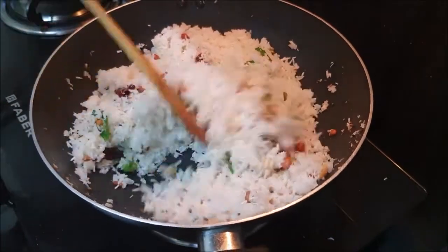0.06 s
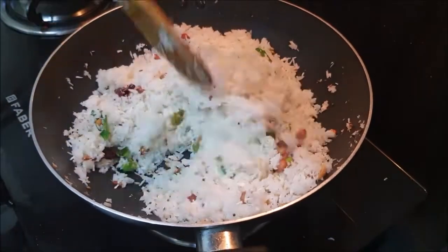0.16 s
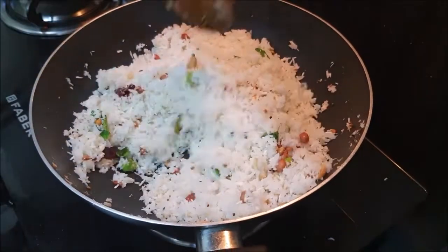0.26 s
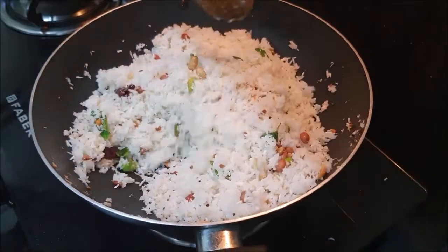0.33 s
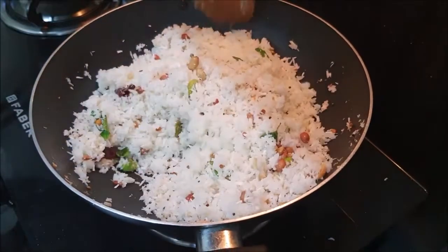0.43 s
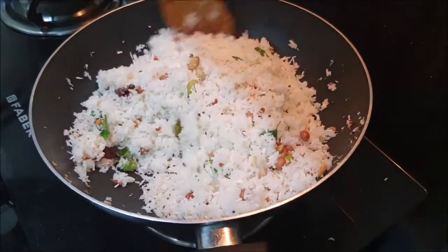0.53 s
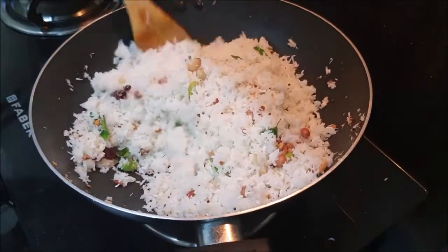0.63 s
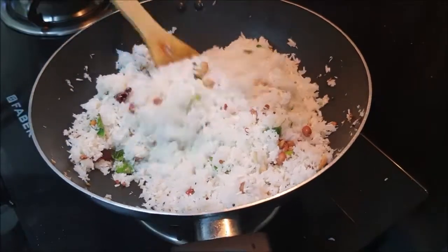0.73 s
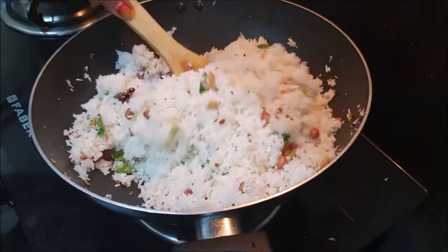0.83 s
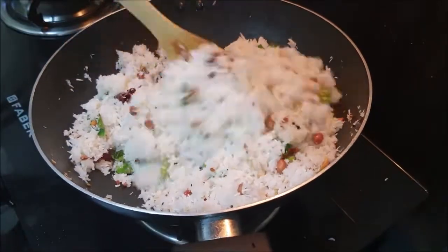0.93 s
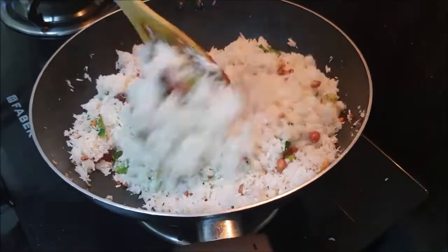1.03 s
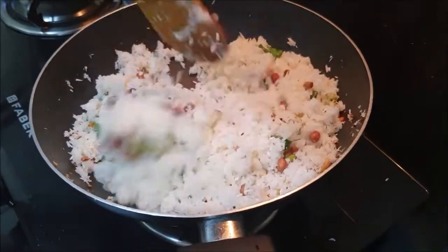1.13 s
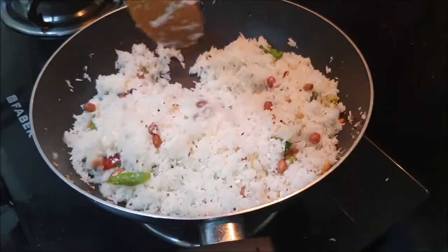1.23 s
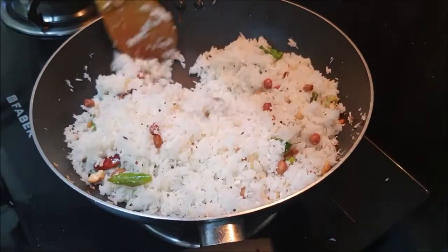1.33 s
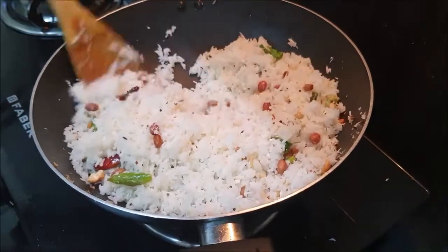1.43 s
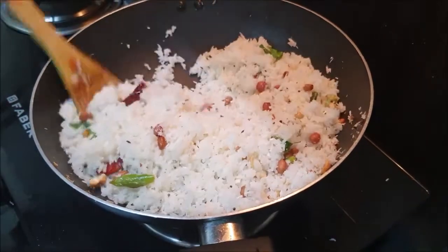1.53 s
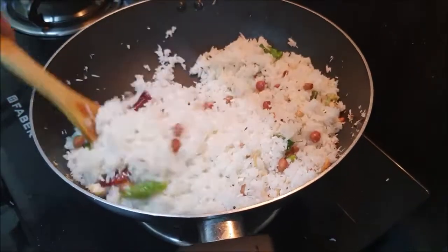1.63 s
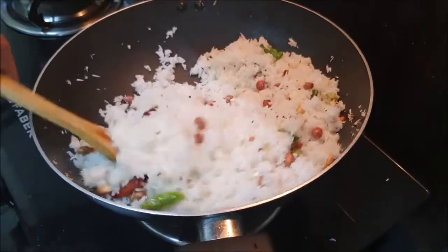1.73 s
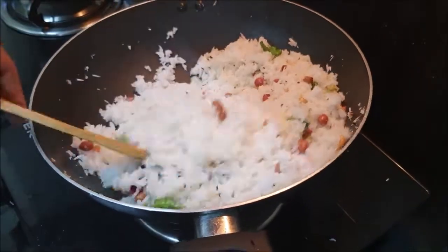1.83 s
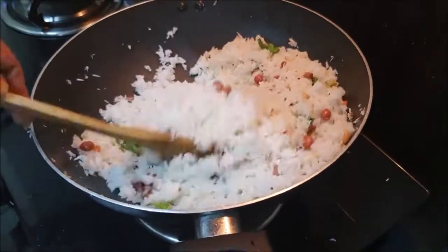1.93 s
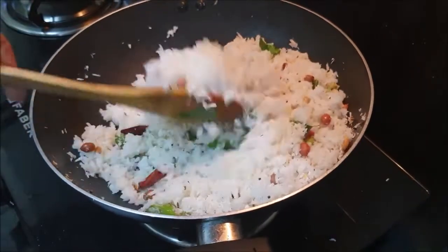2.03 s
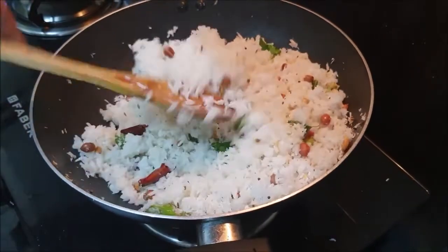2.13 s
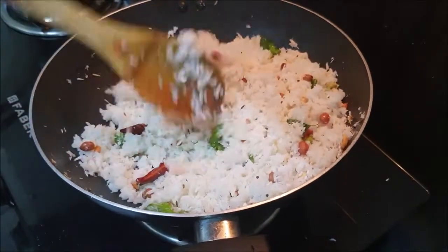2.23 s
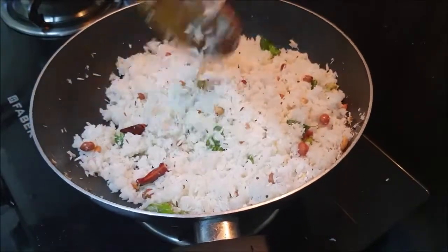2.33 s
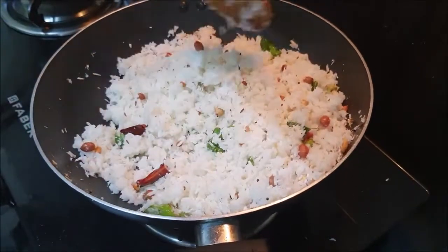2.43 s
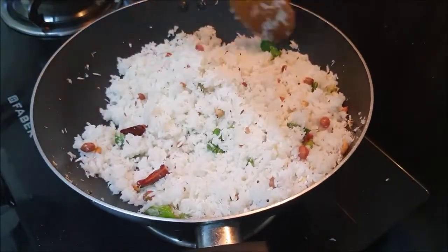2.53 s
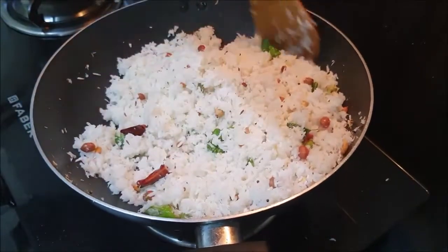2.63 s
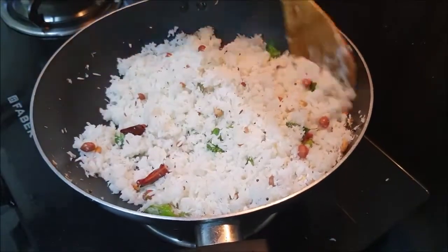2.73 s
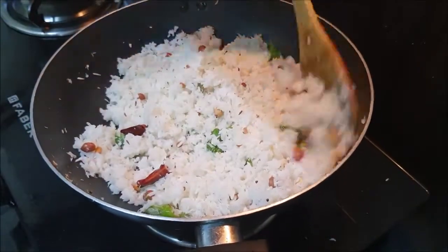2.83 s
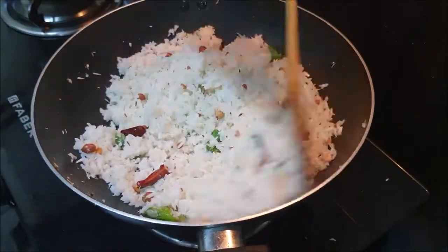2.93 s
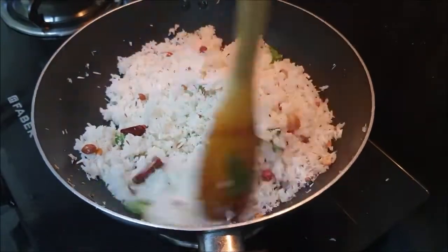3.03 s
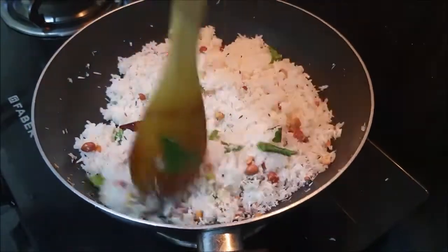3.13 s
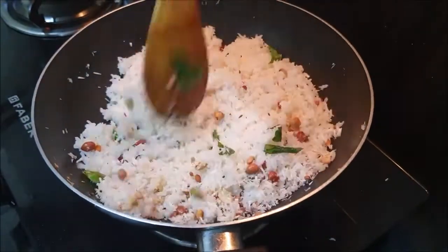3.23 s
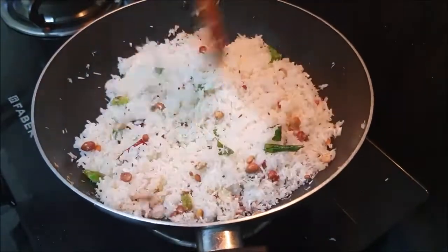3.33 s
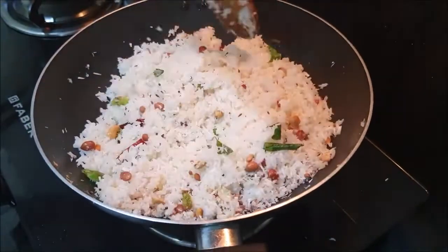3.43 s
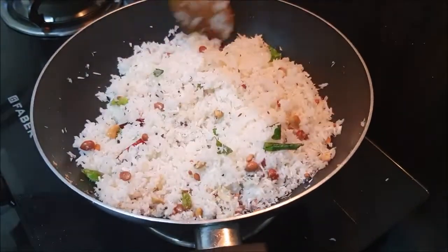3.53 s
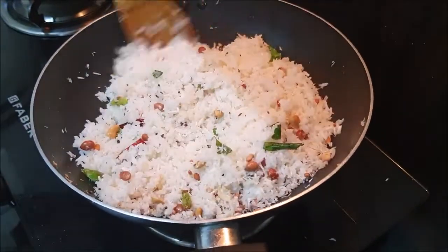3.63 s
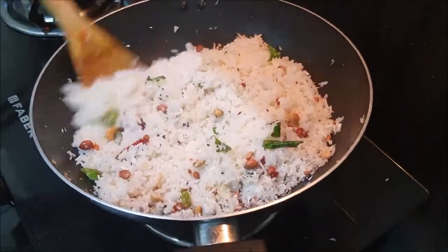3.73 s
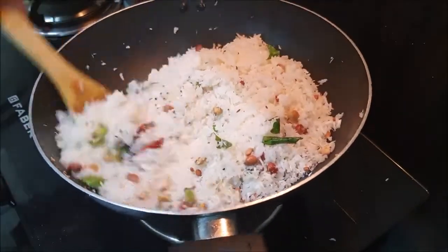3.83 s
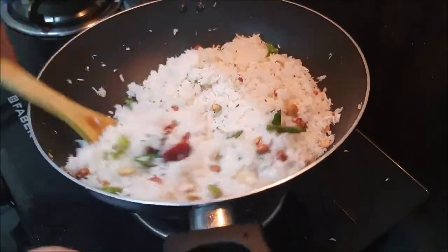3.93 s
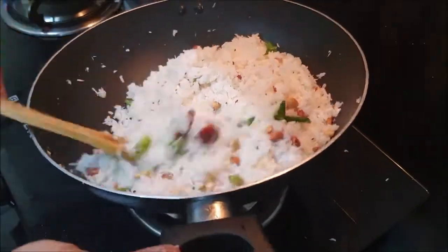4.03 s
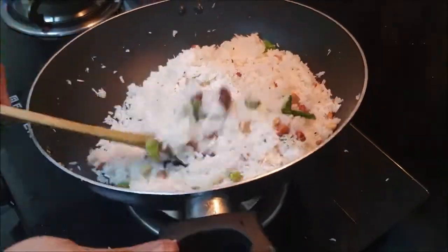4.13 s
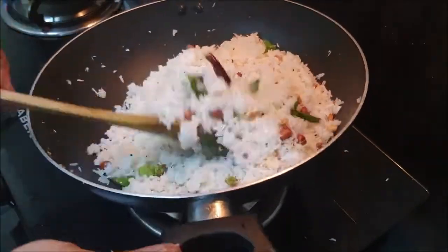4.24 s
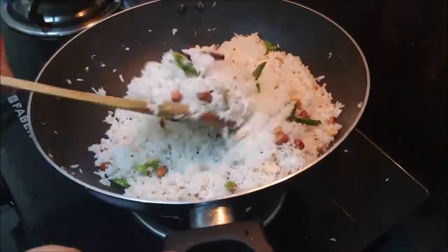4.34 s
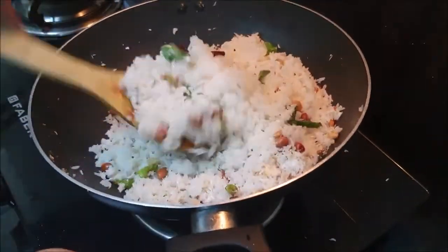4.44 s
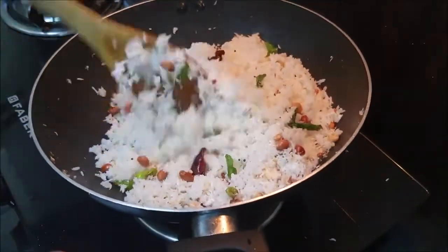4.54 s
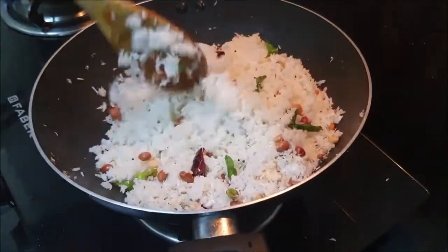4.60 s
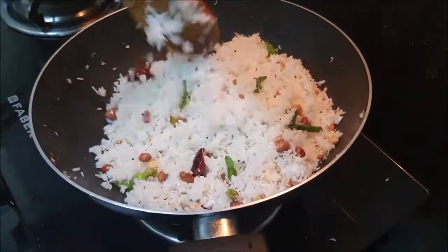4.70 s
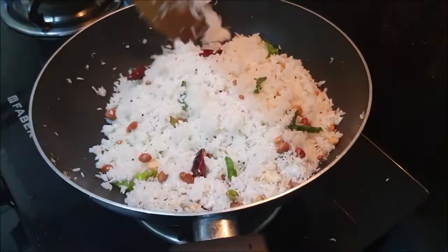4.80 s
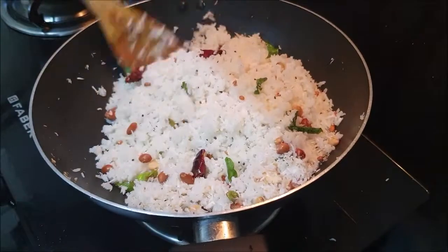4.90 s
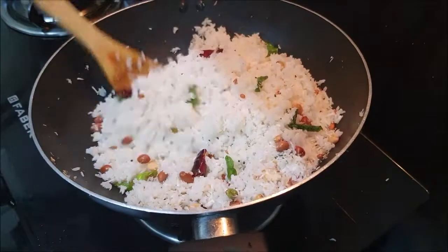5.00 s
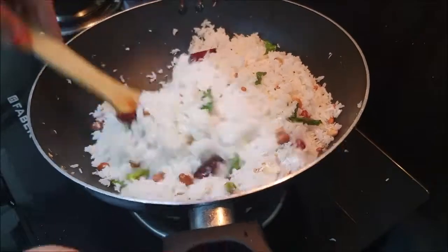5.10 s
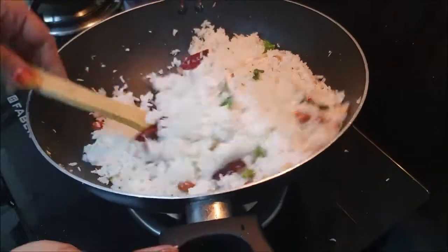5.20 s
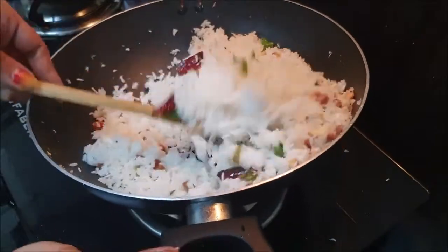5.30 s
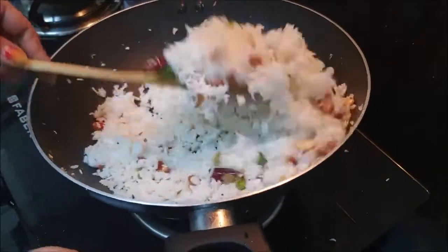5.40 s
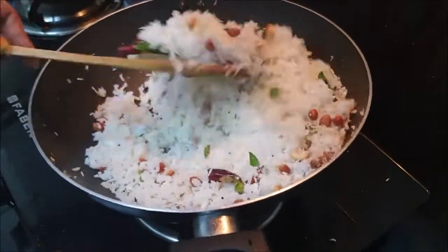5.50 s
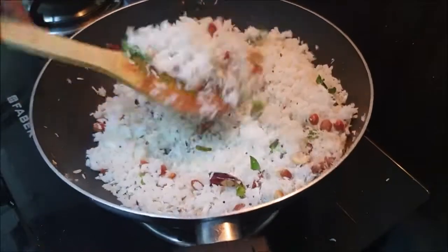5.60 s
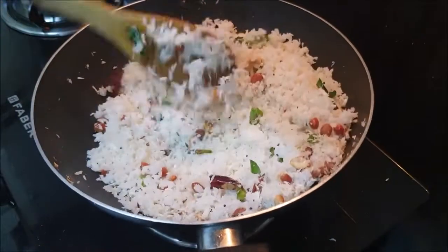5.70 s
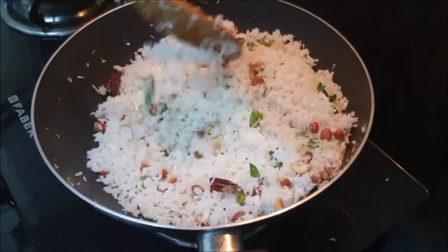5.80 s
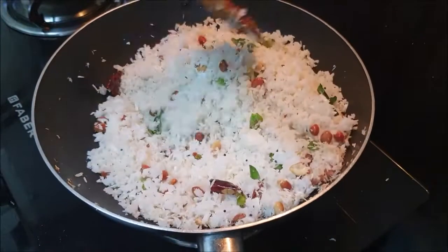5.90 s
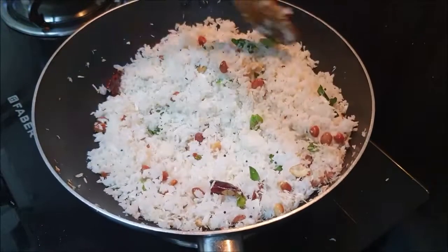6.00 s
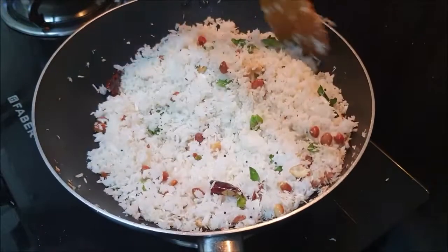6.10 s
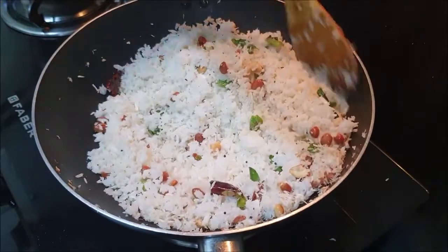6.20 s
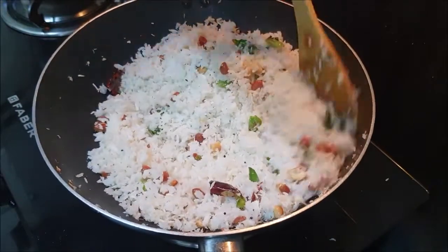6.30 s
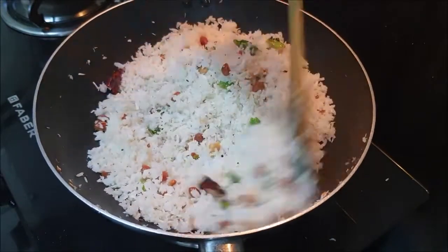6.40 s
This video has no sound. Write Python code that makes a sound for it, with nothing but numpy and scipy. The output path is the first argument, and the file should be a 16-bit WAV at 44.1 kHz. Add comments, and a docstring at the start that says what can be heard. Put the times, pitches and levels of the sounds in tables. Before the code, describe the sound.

Close to a small microphone in a quiet kitchen, a wooden spatula turns rice in a hot pan. Fine hiss swells with the pushes and single drops crack brightly. Seven short, rough scrapes come and go, the one just before four seconds strongest, with light knocks ringing the damped metal, dull low stove shudders and a faint hum. The sizzle thins towards the end.

```python
"""A wooden spatula turns rice in a hot non-stick pan, close to a small microphone. From the start oil and steam hiss
and spit where the hot floor is bared, the edge scrapes, the stove shudders and a faint hum fills the kitchen.
Soon single drops pop, and from half a second on blows of wood or a hard nut ring the pan. Seven scraping strokes
come and go, the fifth the strongest. Hiss and drops are shaped noise; scrapes and blows ring the pan's damped modes."""
import sys
import numpy as np
from scipy import signal
from scipy.fft import rfft, irfft, next_fast_len
from scipy.io import wavfile
from scipy.ndimage import map_coordinates

SR = 44100
rng = np.random.default_rng(int(sys.argv[2]) if len(sys.argv) > 2 else 0)


def linear_from_db(decibels):
    """Turn decibels (scalar or array-like) into linear amplitude factors; 0 gives 1."""
    return 10 ** (np.asarray(decibels, float) / 20)


def wav_out(sig):
    """Save sig, one row per channel (or a flat mono array), as 16-bit PCM at SR to the path in sys.argv[1]."""
    wavfile.write(sys.argv[1], SR, np.round(np.clip(np.atleast_2d(sig).T, -1, 1) * 32767).astype(np.int16))


N = 284709  # samples, about 6.5 s

# oil and steam on the hot metal: (time [s], hiss drive [dB])
HISS_SWELLS = [(0.0, -36.5), (0.15, -43), (0.26, -47), (0.48, -44.5), (0.55, -53), (0.57, -44), (0.64, -43),
               (0.76, -32.5), (0.88, -36.5), (0.97, -48.5), (1.12, -44.5), (1.36, -43.5), (1.49, -42),
               (1.64, -35), (1.8, -41), (1.97, -37.5), (2.2, -43.5), (2.48, -47), (2.6, -48.5), (2.84, -47),
               (2.97, -41.5), (3.21, -36), (3.28, -43), (3.31, -48), (3.44, -51.5), (3.52, -52),
               (3.62, -54), (3.7, -51), (3.715, -39), (3.86, -40), (3.99, -41.5), (4.07, -45.5),
               (4.15, -49), (4.24, -42), (4.33, -49.5), (4.4, -47.5), (4.48, -61), (4.72, -51.5),
               (4.8, -56.5), (4.99, -56), (5.01, -42), (5.14, -40.5), (5.3, -44.5), (5.6, -52), (5.84, -49),
               (6.08, -56.5), (6.26, -52), (6.45, -47.5)]
# colour of the hiss: (frequency [Hz], relative level [dB])
HISS_COLOUR = [(1760, -40), (3000, -18), (4240, -6.5), (4600, -3), (5140, -3), (7510, 1), (9170, -4),
               (13200, -3), (15600, -9)]
# colour of the low sputter under the hiss: (frequency [Hz], relative level [dB])
SPUTTER_COLOUR = [(290, -20), (500, -6.5), (649, -7), (739, -5), (1020, -10), (1210, -4.5), (2010, -2),
                  (3500, -6), (4550, -21), (7700, -120)]
# room murmur: (frequency [Hz], relative level [dB])
MURMUR_COLOUR = [(71, -39), (120, -48), (141, -45), (226, -22), (321, -2.5), (431, -1.5), (459, -5),
                 (796, -14), (866, -12), (1500, -10), (1950, -61), (3300, -120)]
# hum lines: (frequency [Hz], middle peak level [dB], waver speed [random points per s])
HUM_LINES = [(62, -74, 10), (147.2, -71, 4.7)]
# the stove top shudders when the pan is pushed: (time the fall starts [s], level [dB], time to fall 60 dB [s])
STOVE_JOLTS = [(0.0, -56, 0.29), (0.58, -53, 0.21), (0.81, -62, 0.36), (1.72, -77, 0.99), (2.73, -48, 0.37),
               (3.0, -70, 0.33), (3.71, -63, 0.43), (3.96, -71, 1.9), (4.7, -69, 0.32), (5.01, -52.5, 0.32),
               (5.14, -60.5, 0.67), (6.37, -70, 0.35)]
# colour of the shudder: (frequency [Hz], relative level [dB])
STOVE_COLOUR = [(12, -40), (20, -11), (69, 4), (135, -2.5), (179, -6), (260, -4.5), (340, -26), (570, -120)]
# the edge on the metal, one list a stroke:
# (time [s], scrape drive [dB], pitch of the best rung modes [Hz], push drive on the lowest modes [dB])
STROKES = [
    [(0.0, -73, 2090, -59), (0.028, -52.5, 2080, -70), (0.092, -43, 2060, -61), (0.16, -73, 2180, -66)],
    [(0.565, -36.5, 2040, -42), (0.625, -51, 1920, -54), (0.663, -42.5, 1900, -57), (0.755, -39, 2040, -55),
     (0.761, -47, 2040, -55), (0.857, -38, 2050, -60), (0.933, -47, 2060, -66), (0.951, -50, 2080, -52.5),
     (0.99, -57.5, 1890, -62)],
    [(1.472, -41, 1940, -53), (1.524, -39, 1930, -48.5), (1.582, -44.5, 2020, -62),
     (1.61, -43.5, 2000, -47.5), (1.67, -47, 1930, -69), (1.688, -36, 1890, -50), (1.702, -42, 1890, -59),
     (1.718, -38.5, 1800, -54.5), (1.83, -56.5, 2070, -60.5)],
    [(2.72, -56, 1930, -50), (2.762, -58, 1900, -57), (2.868, -47, 1790, -61), (2.94, -51, 1990, -61),
     (3.004, -39, 2060, -54), (3.022, -43.5, 2000, -60.5), (3.086, -54, 2020, -57), (3.232, -67, 2200, -66),
     (3.3, -64, 1850, -61)],
    [(3.712, -51, 1680, -66), (3.77, -31, 1640, -49), (3.796, -32.5, 1770, -60),
     (3.824, -30.5, 2060, -45.5), (3.872, -27.5, 2000, -58), (3.932, -34, 1910, -47.5),
     (3.976, -40.5, 1860, -57), (3.984, -41, 1840, -55), (4.1, -67, 2080, -72)],
    [(5.0, -40, 1810, -48), (5.016, -50, 1820, -50), (5.032, -40.5, 1950, -56), (5.148, -44, 2230, -51.5),
     (5.192, -40.5, 2030, -67), (5.244, -37, 1940, -60), (5.28, -53, 2000, -62), (5.3, -42, 2050, -56.5),
     (5.36, -68, 1990, -68)],
    [(6.3, -54, 2030, -70), (6.316, -73, 2000, -59), (6.326, -64.5, 1980, -61), (6.336, -74, 1950, -58),
     (6.348, -59, 1890, -58), (6.402, -48, 2200, -55), (6.416, -50, 2160, -64), (6.45, -62, 2080, -57)],
]
# how each stroke bears on other modes when the scrape is -45 dB: (modes near 1.2 kHz [dB], high modes [dB])
STROKE_BEARING = [(-65, -35.5), (-55.5, -43.5), (-57, -48), (-67, -45), (-63, -47), (-64, -46),
                  (-54, -43.5)]
# extra drive near 1.2 kHz as the edge squeaks: (centre [s], time from centre to 1/e [s], drive [dB])
EDGE_SQUEAKS = [(0.1, 0.025, -50), (0.882, 0.058, -43.5), (2.775, 0.03, -46.5), (3.007, 0.05, -50),
                (3.8, .04, -55), (5.206, 0.068, -39.5)]
# modes of the loaded pan: (frequency [Hz], width before extra damping [Hz], relative level [dB])
PAN_MODES = [(314, 125, -3), (451.4, 14.3, 7), (494, 125, 2.5), (717, 230, 6), (1000, 37, -3.5),
             (1095, 150, -7), (1290, 20, -0.5), (1506, 9.9, 0), (1677, 54, 7), (1714, 74, 8),
             (1900, 310, 6), (2060, 7.2, 1), (2158, 31, -0.5), (2438, 19, 0.5), (2880, 290, -1),
             (3270, 14, -2), (3303, 32, -2), (3620, 1800, 2), (4860, 8, -1), (5986, 14, 1), (6740, 520, -8),
             (6500, 17, 0), (7180, 14, 1), (8000, 27, -43), (8720, 14, 2.5), (11260, 7.2, 1),
             (13100, 75, -15)]
# the loudest spits, levels before colouring:
# (time [s], peak of the crack [dB], body against the crack [dB], own pitch [Hz])
LOUD_SPITS = [(0.1315, -28, -21, 6270), (0.2024, -29, -11, 7120), (0.2396, -24, -26, 7220),
              (0.2808, -25.5, -14, 7240), (0.3322, -25.5, -22, 8150), (0.3746, -26, -18, 7500),
              (0.4115, -23.5, -15, 8000), (0.435, -20, -13.5, 4830), (0.4626, -26, -23, 7430),
              (0.5023, -23.5, -20, 7220), (0.5408, -28, -12, 8000), (0.5562, -14, -7, 7300),
              (0.605, -19.5, -20, 7300), (0.6527, -19.5, -10, 5380), (0.726, -23, -14, 7120),
              (0.7485, -13, -13, 6510), (0.8952, -21, -14, 7760), (1.213, -23, -25, 5890),
              (1.231, -16.5, -18, 11700), (1.2433, -13.5, -21, 10700), (1.3527, -19, -21, 13700),
              (1.3902, -24, -19, 6640), (1.4266, -24, -25, 5920), (1.614, -20, -21, 7850),
              (1.6784, -13.5, -11.5, 4520), (1.6872, -9.5, -13, 7700), (1.9047, -20, -22, 7060),
              (2.0304, -21.5, -24, 7600), (2.2169, -22, -26, 8700), (2.393, -27, -13, 5320),
              (2.4832, -37, -14, 7380), (2.5077, -15.5, -11.5, 6500), (2.5922, -26.5, -11, 13200),
              (2.619, -28.5, -11, 8020), (2.6383, -24, -20, 6890), (2.6599, -22.5, -16, 7000),
              (2.7053, -25, -5.5, 6860), (2.7743, -23, -17, 5920), (2.7943, -23.5, -14, 5540),
              (2.8225, -28, -6, 6720), (2.8665, -25, -13, 5340), (2.9028, -20, -17, 7000),
              (2.9557, -22, -11, 7520), (3.107, -24.5, -14, 8060), (3.2837, -23.5, -28, 7000),
              (3.4458, -23, -16, 6940), (3.7105, -24.5, -13, 7820), (3.7322, -22.5, -9, 4720),
              (4.0023, -39, -21, 7580), (4.1799, -28, -17, 7730), (4.2013, -20.5, -11, 7460),
              (4.2742, -27.5, -24, 7400), (4.2864, -25, -14, 6050), (4.3268, -23.5, -23, 6500),
              (4.507, -28.5, -16, 5000), (4.6548, -31, -16, 4900), (4.9268, -35.5, -32, 6570),
              (5.2954, -19.5, -21, 7180), (5.6112, -28, -27, 7240), (5.67, -12.5, -27.5, 6840),
              (5.8182, -30, -22, 7600), (5.9229, -41, -16, 6930), (5.9319, -38, -30, 7360),
              (5.9747, -31.5, -12, 6240), (6.0242, -33, -8.5, 7550), (6.1444, -35.5, -11, 7380),
              (6.2033, -34.5, -18, 6890), (6.2719, -26, -14.5, 10900), (6.292, -36, -14, 7320)]
# high part of a spit: (frequency [Hz], relative level [dB])
CRACK_COLOUR = [(2500, -61), (4000, 3.5), (5000, 3), (7000, 4), (10000, 0.5), (15600, 2)]
# low part of a spit: (frequency [Hz], relative level [dB])
BODY_COLOUR = [(300, -21), (800, -8.5), (1500, 0.5), (3000, 2), (4500, -4.5), (7000, -52)]
# wood or a hard nut striking the pan, and at 5.671 s the ringing tail of a loud pop: (time [s], rms level of
# the first 20 ms [dB], # best rung pitch [Hz], loss an octave from it [dB], fading time of the contact [s])
BLOWS = [(0.552, -34.5, 790, 0.5, 0.011), (1.469, -53, 1900, 26, 0.02), (1.678, -37, 1430, 26, 0.0043),
         (2.714, -43, 420, 55, 0.023), (3.558, -47.5, 2300, 13, 0.00085), (3.713, -53, 1590, 31, 0.0093),
         (4.136, -43.5, 1250, 3, 0.02), (4.997, -46.5, 1700, 3, 0.0022), (5.298, -32.5, 6350, 6.5, 0.013),
         (5.671, -33, 6550, 45, 0.0096), (6.225, -62, 1290, 93, 0.022), (6.26, -57.5, 1290, 97, 0.042),
         (6.345, -48.5, 5000, 7, 0.014)]

SPUTTER_DB, SPUTTER_GROWS = -54.5, 0.9  # sputter drive when the hiss is -45.5 dB; dB gained per dB of hiss
JOLT_RISE_S, STOVE_REST_DB = 0.025, -72.5
MID_GROWS, HIGH_GROWS = 0.45, 0.58  # dB gained per dB of scrape
EDGE_DAMPS, EDGE_DAMPS_HZ = 0.0049, 14  # extra width under the edge: share of the pitch per kHz, plus Hz
SNAP_DB, SNAP_T60_S = 7, 0.002  # first snap of a spit over its main part; time to fall 60 dB
POP_T60_S = 0.015  # typical time for a loud spit to fall 60 dB
BLOW_DAMPS, BLOW_RISE = 0.008, 0.053  # extra width as a share of pitch; rise as a share of contact time
TOP_HZ = 15850


def unit(x):
    """Scaled to rms 1."""
    return x / np.sqrt(np.mean(x ** 2) + 1e-20)


def curves(rows):
    """One value per sample for each column after the time."""
    s, *columns = np.transpose(rows)
    return [np.interp(np.arange(N) / SR, s, column) for column in columns]


def wobble(rate):
    """A smooth curve through random points, rate points a second."""
    return map_coordinates(rng.standard_normal(N // 40), [np.arange(N) * rate / SR])


def filtered(x, response, size=N):
    """x passed through a filter given as a function of frequency."""
    m = next_fast_len(size + 8192)  # spare room for the filter's tail
    return irfft(rfft(x, m) * response(np.fft.rfftfreq(m, 1 / SR)), m)[:size]


def colour(spectrum):
    """Gain drawn through (Hz, dB) points on a log axis, keeping the power of white noise."""
    f, db = np.transpose(spectrum)
    return lambda hz: unit(linear_from_db(np.interp(np.log(hz + 1), np.log(f), db)))


def mode(hz, width_hz):
    """One resonance that rings after it is driven, with the same power gain for every width."""
    return lambda f: 1j * f * np.sqrt(width_hz * SR) / (hz * hz - f * f + 1j * f * width_hz)


def bursts(s, db, hz, t60, tail_db, tail_t60, peak_db, size):
    """Noise bursts of set peak, louder or duller by peak_db at their own pitch, with a faint echo in the pan's bowl."""
    t, f = np.arange(size) / SR, np.fft.rfftfreq(size, 1 / SR)
    main = linear_from_db(-60 * t / np.maximum(t60, 1 / SR)[:, None])
    tail = linear_from_db(tail_db - 60 * t / tail_t60)
    snap = linear_from_db(SNAP_DB - 60 * t / SNAP_T60_S)
    shape = (main + tail + snap) * (1 - np.exp(-t / 0.00021))  # rises in a fraction of a millisecond
    tint = linear_from_db(peak_db * np.exp(-8 * np.log2((f + 1) / hz[:, None]) ** 2))
    rows = irfft(rfft(shape * rng.standard_normal((len(s), size))) * tint, size)
    rows = linear_from_db(db)[:, None] * rows / np.abs(rows).max(axis=1, keepdims=True)
    at = np.round(s * SR).astype(int)[:, None] + np.arange(size)
    return np.bincount(at.ravel(), rows.ravel(), N + size + SR)[:N]  # adds bursts that overlap


def small_spits():
    """A crowd of small spits at random times; big ones are rare, as their dB sizes fall off exponentially."""
    when, size, pitch, life = rng.random((1800, 4)).T
    size_db = np.minimum(2.5 - 2.74 * np.log(size), 19)
    hz = 4000 * 3.5 ** pitch
    t60 = 0.0099 + 0.0041 * life ** 2
    return bursts(when * N / SR, size_db, hz, t60, -33.0, 0.03, peak_db=9.0, size=1024)


def sizzle():
    """Steam hiss in quick swells: flickering noise and small spits, coloured once as fizz and once as low sputter."""
    hiss_db, = curves(HISS_SWELLS)
    hiss_db = hiss_db + 0.7 * wobble(12)
    sputter_db = SPUTTER_DB + SPUTTER_GROWS * (hiss_db + 45.5) + 0.5 * wobble(11)
    hiss = linear_from_db(-2.0 + 0.47 * wobble(25) + 2.4 * wobble(90)) * rng.standard_normal(N)
    spits = small_spits()
    fizz = linear_from_db(hiss_db) * filtered(hiss + spits, colour(HISS_COLOUR))
    sputter = linear_from_db(sputter_db) * filtered(hiss + 0.7 * spits, colour(SPUTTER_COLOUR))
    return fizz + sputter


def murmur():
    """Room murmur: coloured noise that slowly wavers in level."""
    noise = unit(filtered(rng.standard_normal(N), colour(MURMUR_COLOUR)))
    return linear_from_db(-66 + 2.2 * wobble(7.7)) * noise


def hum():
    """Two steady pitches that waver slightly in level and phase."""
    t = np.arange(N) / SR
    sound = np.zeros(N)
    for hz, db, waver in HUM_LINES:
        level = linear_from_db(db + 2.9 * wobble(waver))
        sound += level * np.sin(2 * np.pi * hz * t + 0.13 * wobble(waver))
    return sound


def jolts():
    """Strength of the stove's shudder: a restless rest level, and a swell that dies away with each push."""
    t = np.arange(N) / SR
    strength = linear_from_db(STOVE_REST_DB + 1.1 * wobble(8.1))
    for s, db, t60 in STOVE_JOLTS:
        rising = np.maximum(t - (s - JOLT_RISE_S), 0)  # the swell starts just before its listed time
        falling = np.maximum(t - s, 0)
        strength = strength + linear_from_db(db - 60 * falling / t60) * (1 - np.exp(-rising / JOLT_RISE_S))
    return strength


def stove():
    """The stove top shudders: low coloured noise that swells with the pushes."""
    return jolts() * unit(filtered(rng.standard_normal(N), colour(STOVE_COLOUR)))


def contact():
    """Drive on each group of modes: the edge lands at once, lifts off more slowly and rests at -90 dB between strokes."""
    def lifted(s, best_hz):
        return (s, -90, best_hz, -90, -90, -90)

    table = []
    for rows, (mid_db, high_db) in zip(STROKES, STROKE_BEARING):
        table.append(lifted(rows[0][0] - 0.004, rows[0][2]))
        for row in rows:
            over_db = row[1] + 45
            table.append((*row, mid_db + MID_GROWS * over_db, high_db + HIGH_GROWS * over_db))
        table.append(lifted(rows[-1][0] + 0.13, rows[-1][2]))
    scrape_db, best_hz, push_db, mid_db, rasp_db = curves(table)
    t = np.arange(N) / SR
    squeak = linear_from_db(mid_db) + sum(linear_from_db(db) * np.exp(-((t - s) / half) ** 2) for s, half, db in EDGE_SQUEAKS)
    return scrape_db, best_hz, push_db, 20 * np.log10(squeak), rasp_db


def scrape():
    """Flickering noise, for wood sticking and slipping on the coating, rings modes damped by the pressing edge."""
    scrape_db, best_hz, push_db, squeak_db, rasp_db = contact()
    slips = unit(linear_from_db(1.9 * wobble(180)) * rng.standard_normal(N))
    sound = np.zeros(N)
    for k, (hz, width_hz, db) in enumerate(PAN_MODES):
        if hz <= 900:
            drive_db = push_db
        elif hz <= 1400:
            drive_db = squeak_db
        elif hz <= 2600:
            drive_db = scrape_db - 70 * np.log2(hz / best_hz) ** 2  # weaker far from the best rung pitch
        else:
            drive_db = rasp_db - 14 * max(np.log2(hz / 4800), 0)  # soft wood hardly reaches the highest modes
        drive = linear_from_db(drive_db + db - 13.0 + 2.06 * wobble(18)) * slips
        damped_hz = width_hz + EDGE_DAMPS_HZ + EDGE_DAMPS * hz * hz / 1000
        side = (-1) ** k  # neighbouring modes move the air in opposite phase
        sound += side * filtered(drive, mode(hz, damped_hz))
    return sound


def pops():
    """Single drops bursting in the oil: each is a bright crack and a duller body of noise."""
    s, db, body_db, hz = np.transpose(LOUD_SPITS)
    t60 = POP_T60_S * np.exp(0.29 * rng.standard_normal(len(s)))
    crack = bursts(s, db, hz, t60, -11, 0.26, peak_db=4, size=4096)
    body = bursts(s, db + body_db, hz, t60, -8.0, 0.28, peak_db=-11.5, size=4096)
    return filtered(crack, colour(CRACK_COLOUR)) + filtered(body, colour(BODY_COLOUR))


def knocks():
    """Each blow, and one loud pop's tail, is a short rough force; it rings all modes at new strengths, most
    near its best rung pitch."""
    t = np.arange(SR // 4) / SR
    sound = np.zeros(N + SR)
    for s, db, best_hz, focus_db, contact_s in BLOWS:
        rise = 1 - np.exp(-t / (BLOW_RISE * contact_s))
        force = np.exp(-t / contact_s) * rise * rng.standard_normal(len(t))

        def pan(f):
            response = 0
            for k, (hz, width_hz, level_db) in enumerate(PAN_MODES):
                reach_db = level_db - focus_db * np.log2(hz / best_hz) ** 2 + rng.normal(0, 1)
                response = response + (-1) ** k * linear_from_db(reach_db) * mode(hz, width_hz + BLOW_DAMPS * hz)(f)
            return response

        ring = filtered(force, pan, size=len(t))
        early_rms = np.sqrt(np.mean(ring[:SR // 50] ** 2))
        sound[round(s * SR):][:len(t)] += linear_from_db(db) * ring / early_rms
    return sound[:N]


def scene():
    """All sources, heard by one microphone."""
    mix = sizzle() + murmur() + hum() + stove() + scrape() + pops() + knocks()
    return mix[None]


def low_pass(x):
    """Removes everything above the highest recorded frequency."""
    return signal.sosfilt(signal.butter(12, 16830, fs=SR, output="sos"), x)


def record(dry):
    """The microphone's sound with everything from TOP_HZ up cut away."""
    mix = filtered(dry[0], lambda hz: hz < TOP_HZ)[None]
    return low_pass(mix)


dry = scene()
out = record(dry)
wav_out(out)
```